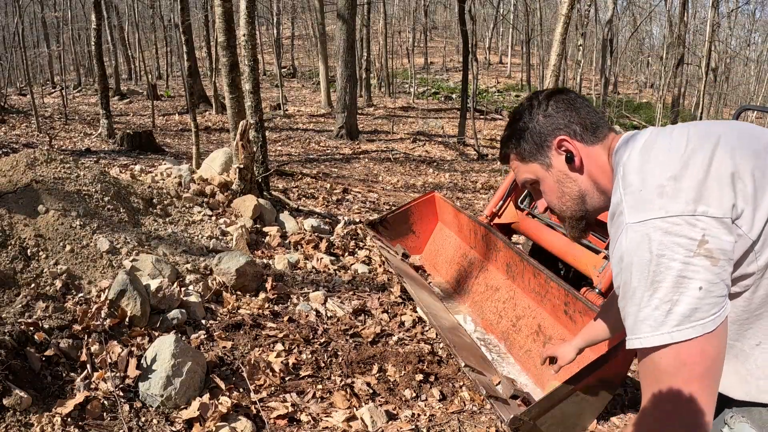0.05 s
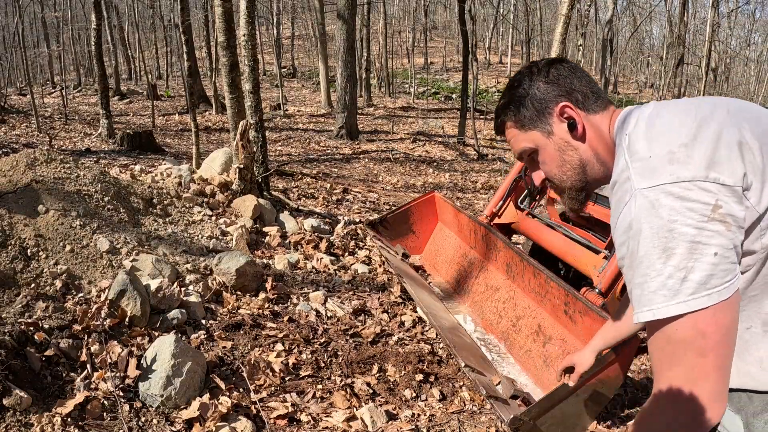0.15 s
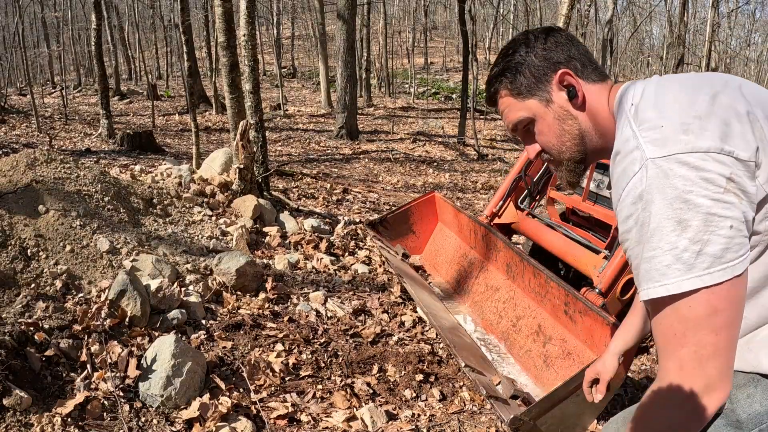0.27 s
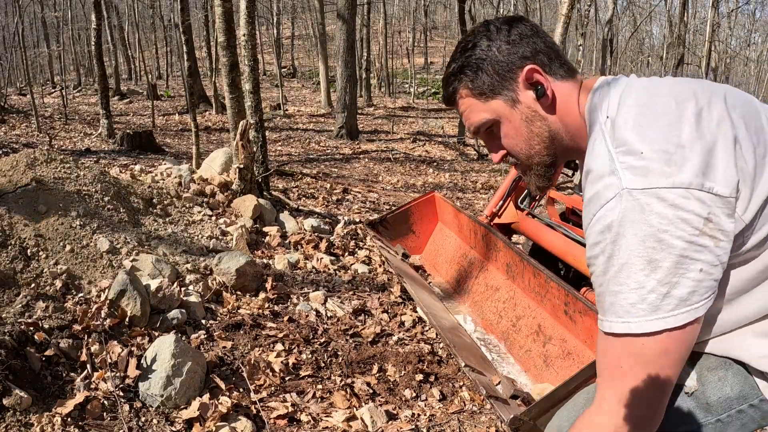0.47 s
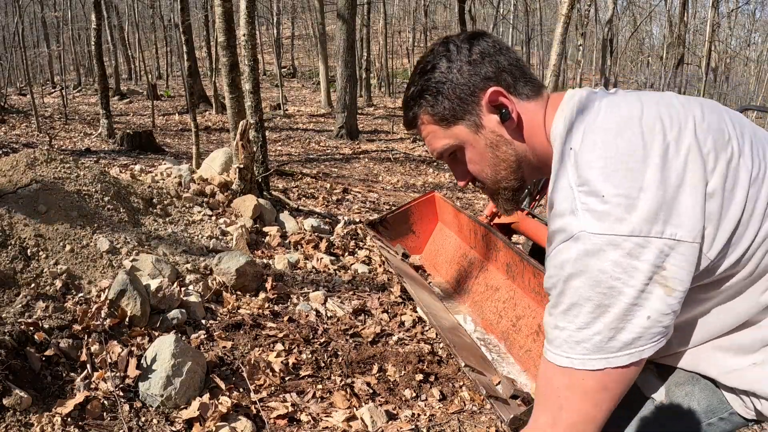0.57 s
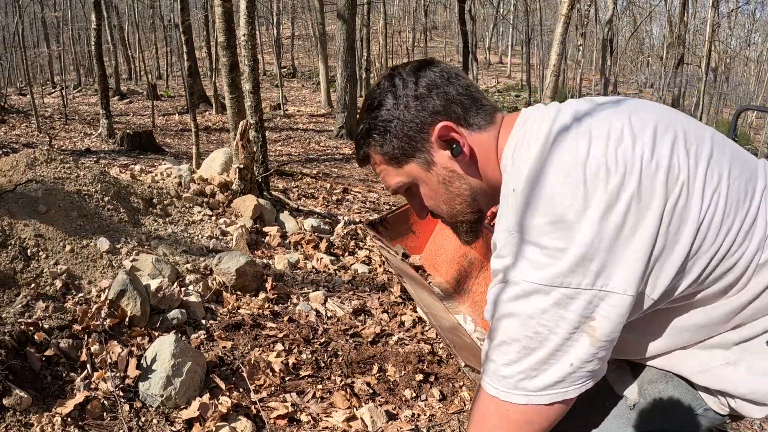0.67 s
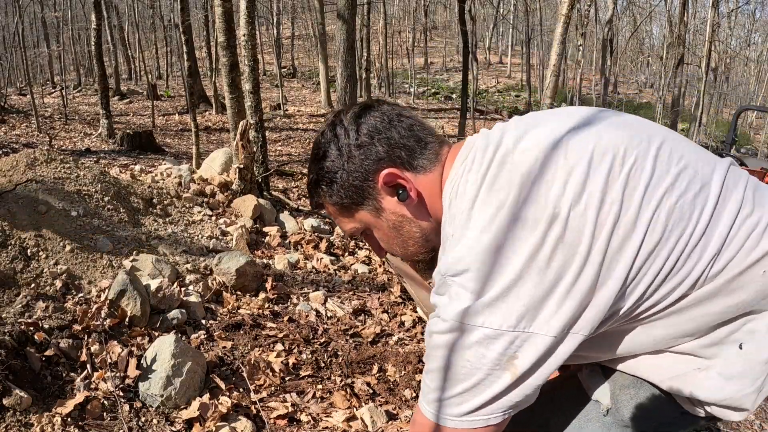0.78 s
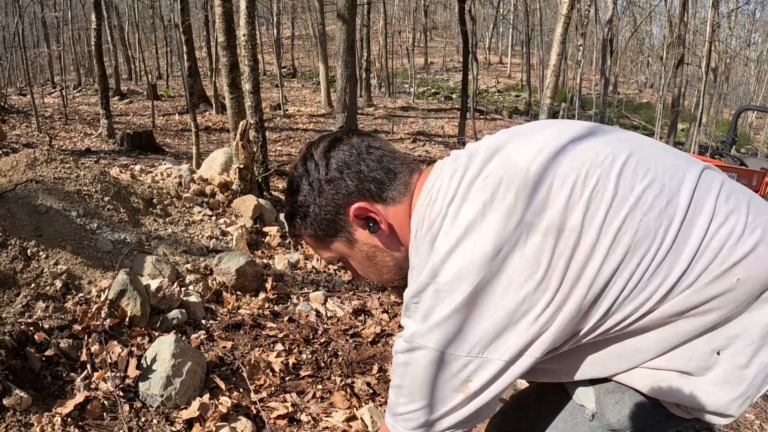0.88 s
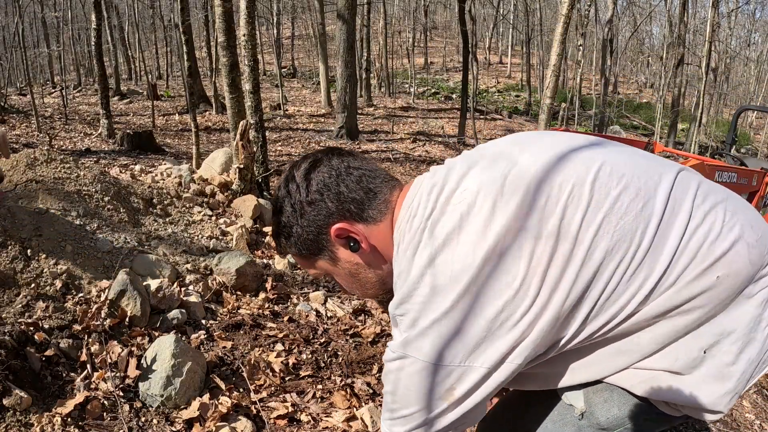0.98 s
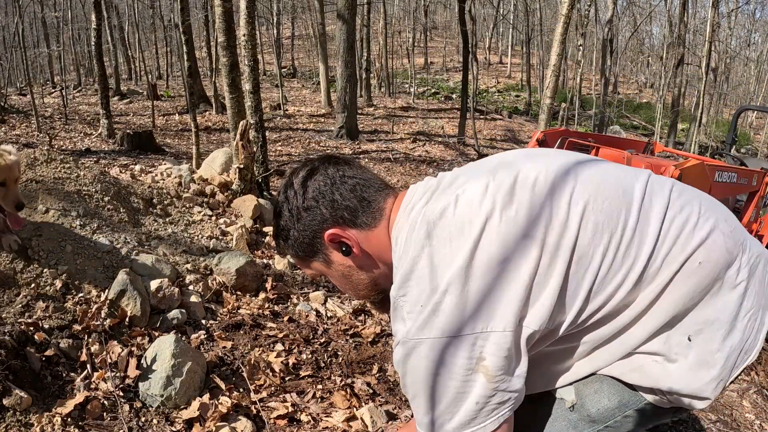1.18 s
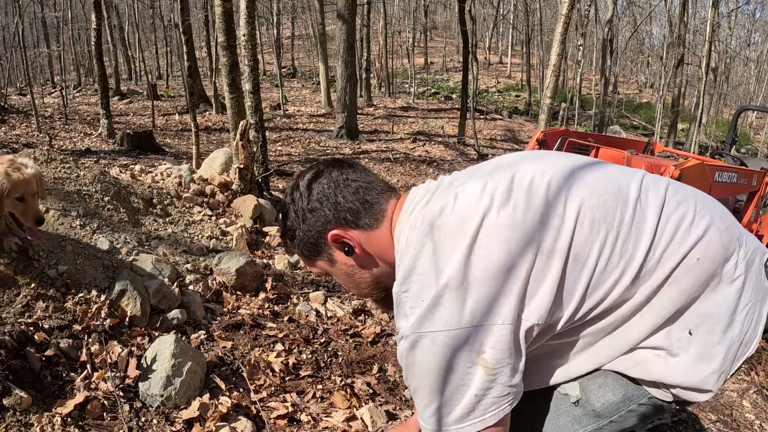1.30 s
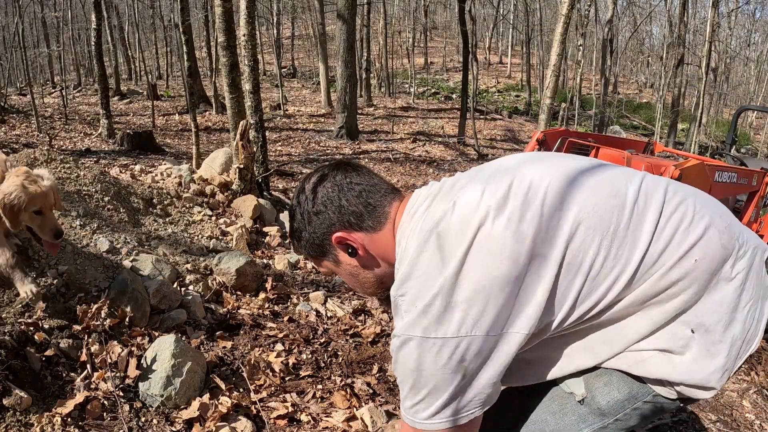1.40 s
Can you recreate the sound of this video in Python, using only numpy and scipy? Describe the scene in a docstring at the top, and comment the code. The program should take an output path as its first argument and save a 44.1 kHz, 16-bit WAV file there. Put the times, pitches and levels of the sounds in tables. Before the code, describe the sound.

A stone clangs into a steel loader bucket and tumbles, followed by faint leaf rustling.

```python
"""Stone in a steel loader bucket.

A stone lands close to the microphone, rebounds and tumbles twice more. Each blow feeds the
same plate modes: a brief clang, a boom from the floor panel, low modes ringing on. Then
clothing and dry leaves rustle and snap as someone bends to the ground, over quiet woodland air."""
import sys
import numpy as np
from scipy import signal
from scipy.fft import rfft, irfft
from scipy.io import wavfile

SR = 44100
rng = np.random.default_rng(int(sys.argv[2]) if len(sys.argv) > 2 else 0)


def transcribe(u):
    """Save the signal u as a 16-bit wav file named by the first command-line argument.

    u: samples, shape (n,) or (channels, n), limited to [-1, 1]; the rate is SR.
    q: integer samples, one column per channel.
    """
    v = np.clip(np.atleast_2d(u).T, -1, 1)
    q = np.round(v * 32767).astype(np.int16)
    wavfile.write(sys.argv[1], SR, q)


N = 63945
BINS_HZ = np.fft.rfftfreq(N, 1 / SR)
TOP_HZ = 15900


def undb(db):
    """Decibels to gain."""
    return 10 ** (np.asarray(db) / 20)


def unit(x):
    """Scale to rms 1."""
    return x / np.sqrt(np.mean(x ** 2))


def on_log(hz, table, column=1):
    """Interpolate a table column over log frequency."""
    rows = np.array(table, float)
    return np.interp(np.log(np.maximum(hz, 1)), np.log(rows[:, 0]), rows[:, column])


def colour(x, spectrum):
    """Filter by (frequency [Hz], gain [dB]) points, then scale to rms 1."""
    return unit(irfft(rfft(x) * undb(on_log(BINS_HZ, spectrum)), N))


def fade(age_s, t60_s):
    """Exponential decay from age 0, silent before."""
    return (age_s > 0) * np.exp(-np.log(1000) * np.maximum(age_s, 0) / t60_s)


def rise(age_s, tau_s):
    """Exponential build-up from age 0."""
    return 1 - np.exp(-np.maximum(age_s, 0) / tau_s)


# air spectrum (frequency [Hz], relative density [dB])
AIR_SPECTRUM = [(20, -9.5), (40, -1), (62, 6.5), (85, -7.5), (145, -13), (260, -13), (600, -22),
                (2000, -35.5), (8000, -45), (16000, -57.5)]
# wind pressure spectrum (frequency [Hz], relative density [dB])
WIND_SPECTRUM = [(2, -7.5), (6, -5), (14, -26), (30, -44), (100, -70)]
AIR_RMS_DB, WIND_RMS_DB = -59, -48.5


def woodland():
    """Faint distant rumble and slow wind pressure on the microphone."""
    air = undb(AIR_RMS_DB) * colour(rng.standard_normal(N), AIR_SPECTRUM)
    wind = undb(WIND_RMS_DB) * colour(rng.standard_normal(N), WIND_SPECTRUM)
    return air + wind


def contact(hz, thud_db, edge_hz, thud_hz=420, thud_octaves=0.6):
    """Force spectrum of a blow: a flat landing pushes the panel, a blunt one lacks treble."""
    thud = np.exp(-.5 * (np.log2(hz / thud_hz) / thud_octaves) ** 2)
    return undb(thud_db * thud) / np.sqrt(1 + (hz / edge_hz) ** 8)


# stone on steel (time [s], level [dB], low-mode boost [dB], floor boom [dB], contact edge [Hz])
STONE_BLOWS = [(0.1978, -2.5, 5, -40, 16000), (0.2, 1, -1, -36, 12100), (0.2065, -35.5, 23, -21.5, 14800),
               (0.2415, -7.5, -12.5, -36, 3440), (0.3756, -19.5, 19.5, -9.5, 2950),
               (0.4549, -19.5, 13.5, -34, 3480), (0.519, -32, 12, -28.5, 1960)]


def ring(t, hz, t60_s, build_s=0.00023):
    """Envelope of a resonance: the blows add in energy, each dying away."""
    coarse_t = t[::8]
    energy = 0
    for start_s, db, thud_db, _, edge_hz in STONE_BLOWS:
        age_s = coarse_t - start_s
        force = undb(db) * contact(hz, thud_db, edge_hz)
        energy += (force * rise(age_s, build_s) * fade(age_s, t60_s)) ** 2
    return np.interp(t, coarse_t, np.sqrt(energy))


def swing(t, hz, delay_at_1khz_s=.0065):
    """Sine of one mode, phased from the hardest blow; slower bending waves make the lows lag."""
    hardest_s = STONE_BLOWS[1][0]
    delay_s = delay_at_1khz_s * np.sqrt(1e3 / hz)
    return np.sin(2 * np.pi * hz * (t - hardest_s - delay_s))


# main bucket modes (frequency [Hz])
BUCKET_MODES_HZ = [42, 104, 145, 155, 178, 207.5, 240, 289, 327, 459, 495, 576, 671, 705, 784.7, 868, 918,
                   966, 985, 1018, 1127, 1256, 1330, 1464, 1539, 1651, 1750, 1844, 2258, 2514, 2741, 3086,
                   3725]
# their ringing, same order (level [dB], t60 [s])
BUCKET_RING = [(-33.5, .13), (-35.5, 0.067), (-42, 3.3), (-35.5, 1.85), (-42, 2.85), (-41, 3.94),
               (-28, 1.05), (-25, 0.84), (-31, 1.23), (-36.5, 1.94), (-43.5, 1.67), (-38.5, 0.47),
               (-32, 0.85), (-26, 0.34), (-33, 2.08), (-24, 0.24), (-20.5, 0.2), (-17, 0.079),
               (-14.5, 0.24), (-22.5, .45), (-26.5, 0.17), (-16.5, 0.29), (-24.5, 0.24), (-24, 0.2),
               (-17.5, .24), (-14.5, 0.19), (-40, 1), (-21.5, 0.15), (-25.5, 0.22), (-25.5, 0.096),
               (-43, 0.19), (-14.5, 0.077), (-26, .14)]


def bucket_modes(t, gain_db=-1.5):
    """Every blow drives the same main modes of the steel."""
    return sum(undb(gain_db + db) * ring(t, hz, t60_s) * swing(t, hz)
               for hz, (db, t60_s) in zip(BUCKET_MODES_HZ, BUCKET_RING))


# weak plate modes (frequency [Hz], relative density [dB], t60 [s])
WEAK_MODES = [(30, -4.5, 0.21), (75, -8.5, .2), (204.3, -4, 0.72), (490, -15, 0.73), (1000, 1.5, 0.21),
              (1760, -4, 0.25), (3754, -8, 0.14), (4440, -18.5, 0.13), (8580, -26, 0.12),
              (11000, -34.5, .1), (15100, -33.5, .07)]
# their lightly damped share (frequency [Hz], level [dB])
PLATE_TAIL = [(100, -27.5), (500, -20), (1000, -27), (2000, -32.5), (4000, -43.5), (8000, -39)]
TAIL_T60_S, MODE_SPACING_HZ, BLUR_BELOW_HZ = 2.12, 17, 660


def plate_clang(t, gain_db=-12.5):
    """Many weak, irregularly spaced plate modes decay band by band; the lows blur into a rumble."""
    noise_spectrum = rfft(rng.standard_normal(N))
    modes_per_bin = SR / N / MODE_SPACING_HZ
    mode_count = np.floor(np.cumsum(rng.gamma(.25, 4, len(BINS_HZ))) * modes_per_bin)
    is_mode = np.diff(mode_count, prepend=0) > 0
    lines = np.where(BINS_HZ > BLUR_BELOW_HZ, is_mode / np.sqrt(modes_per_bin), 1)
    spectrum = rfft(colour(irfft(noise_spectrum * lines, N), WEAK_MODES))
    edges_hz = np.geomspace(20, 17000, 44)
    out = np.zeros(N)
    for low_hz, high_hz in zip(edges_hz[:-1], edges_hz[1:]):
        hz = np.sqrt(low_hz * high_hz)
        clang = ring(t, hz, on_log(hz, WEAK_MODES, column=2))
        tail = undb(on_log(hz, PLATE_TAIL)) * ring(t, hz, TAIL_T60_S)
        band = irfft(spectrum * ((BINS_HZ >= low_hz) & (BINS_HZ < high_hz)), N)
        out += undb(gain_db) * np.hypot(clang, tail) * band
    return out


# floor panel mode pair (frequency [Hz], level [dB])
FLOOR_MODES = [(289, 0), (327, -2)]


def floor_boom(t, build_s=0.025, t60_s=0.19):
    """The floor panel swells like a drum when the stone lands flat on it."""
    energy = sum((undb(boom_db) * rise(t - start_s, build_s) * fade(t - start_s, t60_s)) ** 2
                 for start_s, _, _, boom_db, _ in STONE_BLOWS)
    return np.sqrt(energy) * sum(undb(db) * swing(t, hz) for hz, db in FLOOR_MODES)


# rustle envelope (time [s], level [dB])
RUSTLE_LEVEL = [(0, -73), (.3, -70.5), (.555, -68.5), (.6, -56.5), (.65, -56.5), (.68, -63.5), (.715, -52),
                (.78, -59.5), (.89, -58.5), (.925, -42), (.975, -46), (1.07, -47.5), (1.15, -51),
                (1.2, -49.5), (1.3, -56), (1.37, -58), (1.45, -64)]
# bright first swish (frequency [Hz], relative density [dB])
SWISH_SPECTRUM = [(200, -1.5), (600, -17), (1100, 0.5), (3400, 0.5), (4800, -5.5), (6500, -1.5),
                  (10000, -7.5), (16000, -15.5)]
# duller scuffing (frequency [Hz], relative density [dB])
SCUFF_SPECTRUM = [(80, 2.5), (200, -2), (400, -1.5), (700, -6), (1500, -3), (3300, -8.5), (4800, -16.5),
                  (6500, -12.5), (10000, -19), (16000, -24)]
SLIPS_PER_S, SLIP_SPREAD_DB, SLIP_POWER_SHARE = 2200, 3, 0.55
SCUFF_FROM_S, CROSSFADE_S = 1, 0.073


def rustle(t):
    """Cloth and dry leaves: tiny slips over a smooth rub, bright at first, duller near the ground."""
    slips = (rng.random(N) < SLIPS_PER_S / SR) * rng.standard_normal(N)
    slips *= undb(SLIP_SPREAD_DB * np.minimum(rng.exponential(size=N), 4))
    smooth = rng.standard_normal(N)
    rub = np.sqrt(SLIP_POWER_SHARE) * unit(slips) + np.sqrt(1 - SLIP_POWER_SHARE) * smooth
    flutter_db = colour(rng.standard_normal(N), [(20, 13), (70, -7.5), (250, -29), (900, -97.5)])
    level_db = np.interp(t, *np.array(RUSTLE_LEVEL).T) + flutter_db
    dull = .5 + .5 * np.tanh((t - SCUFF_FROM_S) / CROSSFADE_S)
    swish = (1 - dull) * colour(rub, SWISH_SPECTRUM)
    scuff = dull * colour(rub, SCUFF_SPECTRUM)
    return undb(level_db) * (swish + scuff)


# leaves and twigs snapping (time [s], peak [dB], centre [Hz])
TWIG_SNAPS = [(.718, -45, 7260), (.789, -42, 1870), (.815, -47.5, 6880), (0.884, -46, 1500),
              (.950, -41, 3232), (1.059, -35, 1810), (1.116, -49, 1516), (1.3665, -44, 1200)]


def snaps(t, t60_s=0.03):
    """Single dry cracks, each in one broad resonance."""
    out = np.zeros(N)
    for start_s, peak_db, hz in TWIG_SNAPS:
        burst = rng.standard_normal(N) * fade(t - start_s, t60_s)
        bandpass = signal.butter(2, [hz / 2, min(hz * 2, TOP_HZ)], "band", fs=SR, output="sos")
        crack = signal.sosfilt(bandpass, burst + 1e-18)  # offset avoids denormals
        out += undb(peak_db) * crack / np.abs(crack).max()
    return out


def scene():
    """All sources at one microphone."""
    t = np.arange(N) / SR
    bucket = bucket_modes(t) + plate_clang(t) + floor_boom(t)
    return (bucket + rustle(t) + snaps(t) + woodland())[None]


def record(dry):
    """The recorder rounds off the loudest peaks and cuts the top."""
    ceiling = .69
    rounded = dry / (1 + (dry / ceiling) ** 6) ** (1 / 6)
    lowpass = signal.ellip(8, .2, 70, TOP_HZ, fs=SR, output="sos")
    return signal.sosfilt(lowpass, rounded)


dry = scene()
out = record(dry)
transcribe(out)
```